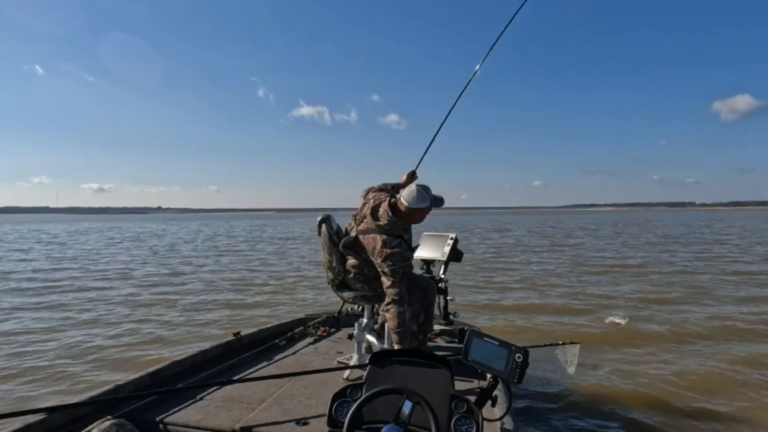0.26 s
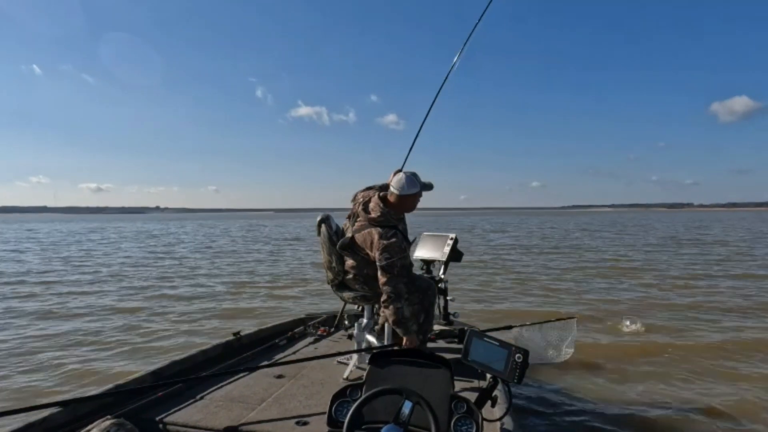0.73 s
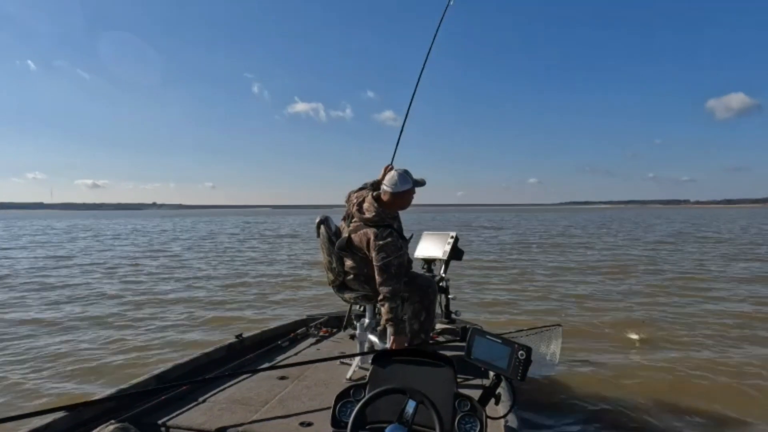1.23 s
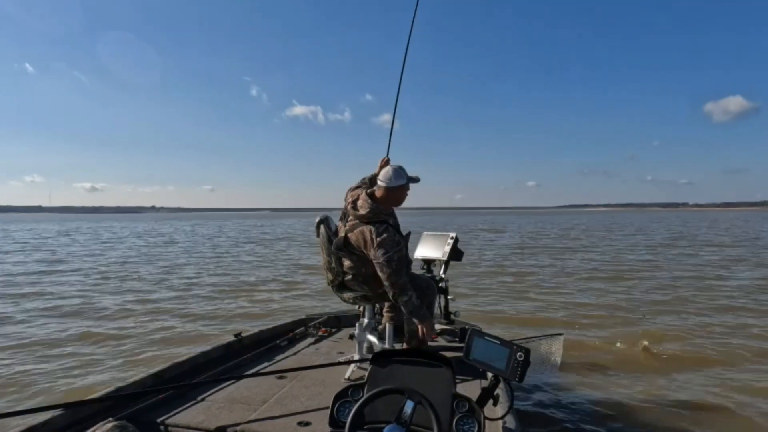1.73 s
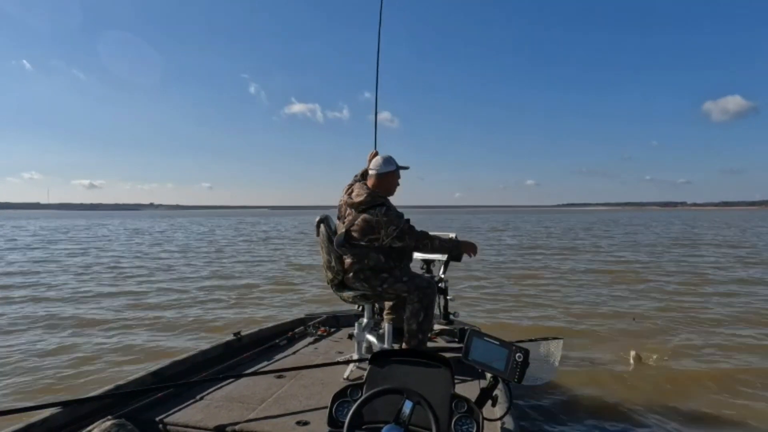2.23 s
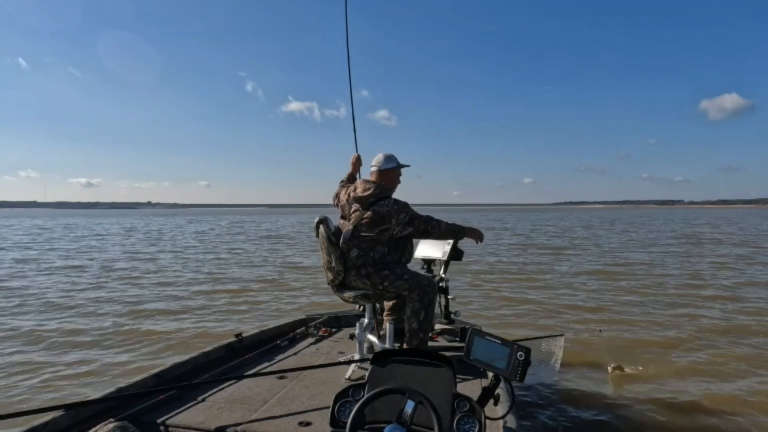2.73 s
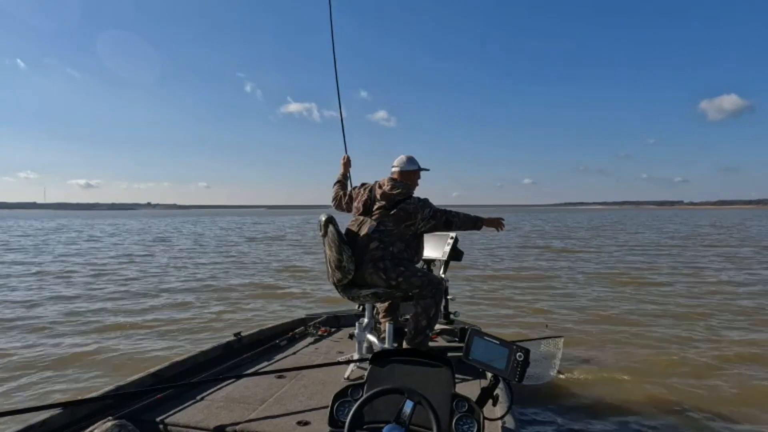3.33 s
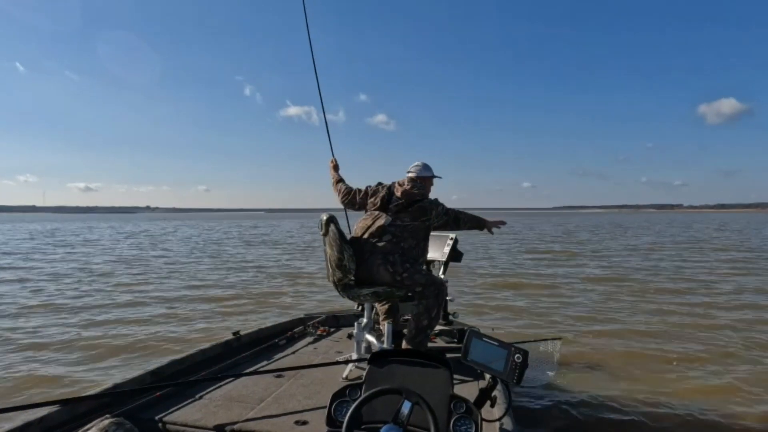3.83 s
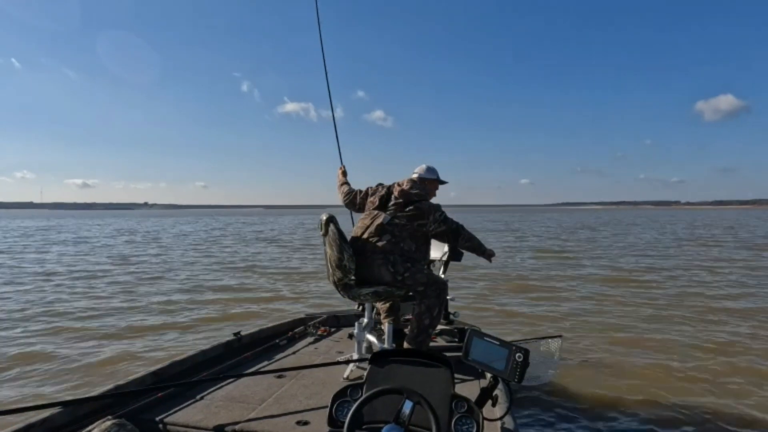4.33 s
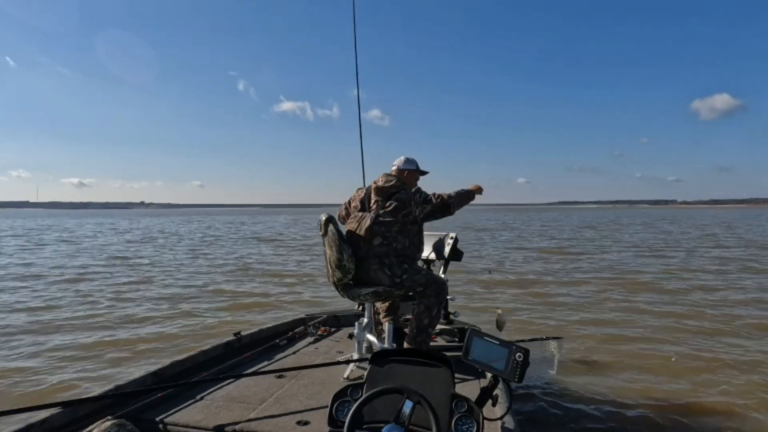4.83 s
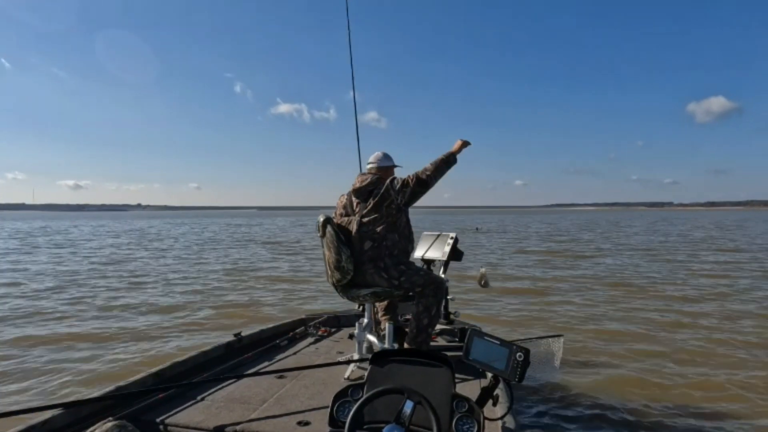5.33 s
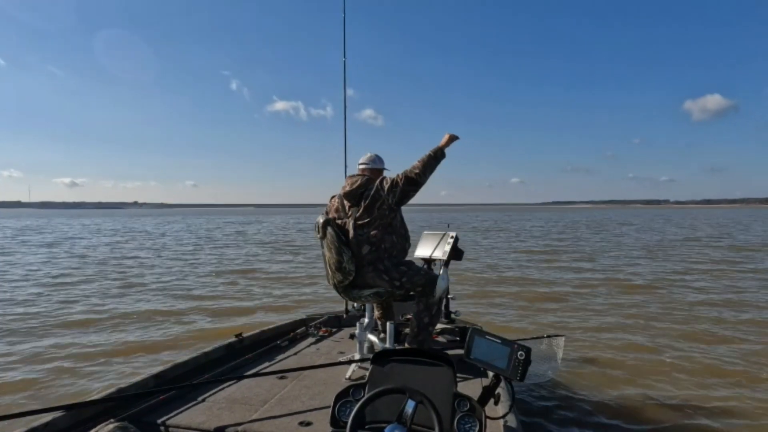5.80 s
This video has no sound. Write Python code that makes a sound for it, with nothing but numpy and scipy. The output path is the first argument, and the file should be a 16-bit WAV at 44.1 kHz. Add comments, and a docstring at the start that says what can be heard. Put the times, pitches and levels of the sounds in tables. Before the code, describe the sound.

A close stereo scene beside a small fishing boat on a choppy lake. Low wind and swell rumble throughout, beneath uneven gurgling, fizz and rising bubbles. A soft hollow lap opens at 0.1 s, followed by small spills and bright plops. Gear clatters on the deck around 0.6-0.8 s, grainy and briefly ringing, as a wave crests; a harder clatter comes at 1.6-1.85 s among deeper plops. Water washes past at 2.2 s, then crisp ticks, a sharp lap at 2.9 s and sliding gulps lead into a dense cluster of plops around 3.4-3.6 s. Laps and a deep trapped-air boom land near 3.87 s. Three hard wet smacks strike the hull at about 4.23, 4.36 and 4.5 s, with short bright ringing over a low hum that sinks and fades by 5.1 s. Faint drips, a double lap and low boom near 5.25 s, and soft spills finish in calmer water until 6 s.

```python
"""On a choppy lake, along the hull of a small fishing boat, heard through a two-port stereo microphone.
Water gurgles and fizzes in noise and rising bubbles; laps, gulps, plops and spills are single events.
An angler sets gear down on the deck in two clattering bursts of grainy, ringing noise, then swings in
a fish: three hard smacks ring the hull over a low hum that sinks away; drips and soft laps follow.
Behind it all lies the filtered noise of wind and swell, with booms of trapped air as low sines."""
import sys
import numpy as np
from scipy import signal
from scipy.fft import rfft, irfft, next_fast_len
from scipy.io import wavfile
from scipy.ndimage import uniform_filter1d, map_coordinates

SR = 44100
rng = np.random.default_rng(int(sys.argv[2]) if len(sys.argv) > 2 else 0)


def store_wav(level_fs):
    """Save 16-bit WAV to argv[1]."""
    pcm = np.round(np.clip(np.atleast_2d(level_fs), -1, 1) * 32767)
    wavfile.write(sys.argv[1], SR, pcm.T.astype(np.int16))


N = 267246  # samples


def amp(db):
    """Amplitude of a level in dB."""
    return 10 ** (np.asarray(db) / 20)


def unit(x):
    """x scaled to rms 1."""
    return x / np.sqrt(np.mean(x ** 2) + 1e-20)


def along(points, hz):
    """Interpolate (frequency, value) points on a log frequency axis."""
    point_hz, values = np.transpose(points)
    return np.interp(np.log(hz + 1), np.log(point_hz + 1), values)


def curves(rows):
    """One value per sample for each column after the time."""
    times, *columns = np.transpose(rows)
    return [np.interp(np.arange(N) / SR, times, column) for column in columns]


def wobble(rate, size=N):
    """A smooth random curve with rate knots a second."""
    knots = rng.standard_normal(int(size * rate / SR) + 4)
    return map_coordinates(knots, [np.arange(size) * rate / SR])


def filtered(x, response):
    """Multiply the spectrum of x by a response of frequency."""
    length = x.shape[-1]
    padded = next_fast_len(length + SR // 10)
    spectrum = rfft(x, padded) * response(np.fft.rfftfreq(padded, 1 / SR))
    return irfft(spectrum, padded)[..., :length]


def add(track, s, sound):
    """Mix a sound into a track at time s."""
    start = max(round(s * SR), 0)
    part = track[..., start:start + sound.shape[-1]]
    part += sound[..., :part.shape[-1]]


# How alike the two sides of broad sounds are: (frequency [Hz], correlation [0 to 1])
LIKENESS = [(25, 0.83), (1000, 0.5), (13000, 0.9)]


def spread(pair, spectrum):
    """Two unrelated signals, mixed as mid and side, become one coloured stereo sound of rms 1."""
    def mid_side(hz):
        turn = np.arccos(np.clip(along(LIKENESS, hz), -1, 1)) / 2
        return amp(along(spectrum, hz)) * [np.cos(turn), np.sin(turn)]

    mid, side = filtered(pair, mid_side)
    return unit(np.array([mid + side, mid - side]))


def bubble(hz, t60, climb):
    """An air pocket rings as a decaying sine and rises by climb octaves over its life."""
    t = np.arange(int(t60 * SR) + 2) / SR
    pitch = hz * 2 ** (climb * t / t60)
    tone = np.sin(2 * np.pi * np.cumsum(pitch) / SR)
    return tone * amp(-60 * t / t60) * (1 - np.exp(-t * hz))


def crowd(low_hz, high_hz, cycles, range_db, count):
    """Many bubbles ring at random times, most of them faint; rms 1."""
    out = np.zeros(N)
    for when, pitch, life, size, climb in rng.random((count, 5)):
        hz = low_hz * (high_hz / low_hz) ** pitch
        sound = bubble(hz, cycles * (.5 + life) / hz, 1.7 * climb ** 1.3)
        add(out, when * N / SR, amp(range_db * size ** 3) * sound)
    return unit(out)


def dying(x, t, decay):
    """Each octave of x fades at its own speed from t = 0."""
    centres = np.geomspace(100, 12800, 8)

    def octaves(hz):
        return np.array([along(list(zip(centres, pick)), hz) for pick in np.eye(len(centres))])

    fades = amp(-60 * np.maximum(t, 0) / along(decay, centres)[:, None])
    return np.sum(filtered(x, octaves) * fades, axis=0)


def voiced(x, thud_db, body_db, edge_db):
    """Weigh the bands of a blow; the short-time rms of the crack (1200-3500 Hz) peaks at 1."""
    edges = [70, 400, 1200, 3500, 15000]  # Hz; thud, body, crack, edge lie between
    out = 0
    for lo, hi, db in zip(edges, edges[1:], [thud_db, body_db, 0, edge_db]):
        band = filtered(x, lambda hz: 1 / (1 + (hz / hi) ** 10) - 1 / (1 + (hz / lo) ** 10))
        out = out + band * amp(db) / np.sqrt(uniform_filter1d(band ** 2, size=256).max())
    return out


PEAK_AT_S = .02  # where a blow reaches its peak


def blow(tone, decay, length, rise, grain_db, hold=0):
    """Grainy noise, like tiny contacts, swells to its peak, lasts for hold seconds and dies away."""
    t = np.arange(SR // 2) / SR - PEAK_AT_S
    contacts = rng.standard_normal(len(t)) * amp(grain_db * wobble(400, size=len(t)))
    swell = np.exp(-(np.minimum(t, 0) / rise) ** 2)
    coloured = filtered(contacts, lambda hz: amp(along(tone, hz)))
    return dying(coloured * swell, (t - hold) / max(length, .1), decay)


def ringing(modes, width_hz, length):
    """Loose panels ring in rough bands, width_hz at 1 kHz and wider above; length scales the decay."""
    t = np.arange(SR // 2) / SR
    hz, db, t60 = np.transpose(modes)[:, :, None]
    width = width_hz * np.sqrt(hz / 1000)
    noise = rng.standard_normal((len(modes), len(t)))
    bands = filtered(noise, lambda f: np.exp(-2 * ((f - hz) / width) ** 2))
    fades = amp(db - 60 * t / (t60 * length)) * (1 - np.exp(-t / 0.0025))
    return sum(unit(band * fade) * np.sqrt(np.mean(fade ** 2) / 2) for band, fade in zip(bands, fades))


def glancing(x, echo_db, t60):
    """Sound reaches each ear directly and by short detours over the rippled water and the deck."""
    t = np.arange(SR // 20) / SR
    shared = rng.standard_normal(len(t))
    paths = (shared + rng.standard_normal((2, len(t)))) * amp(-60 * t / t60)
    paths *= amp(echo_db) / np.linalg.norm(paths, axis=1, keepdims=True)
    return x + signal.fftconvolve(x[None], paths, axes=1)[:, :N]


# Waves running along the hull:
# (crest time [s], gurgle level [dB], fizz level [dB], ebb to 10 dB below the crest [s])
WAVES = [(0.69, -46.5, -56, 0.38), (1.564, -50, -57, 0.3), (2.22, -53, -62, 0.39),
         (2.598, -57.5, -63, 0.26), (3.011, -53, -61.5, 0.15), (3.525, -52.5, -62.5, 0.22),
         (3.784, -59, -55, 0.078), (4.076, -52, -62, 0.12), (4.381, -49.5, -61, 0.22),
         (4.68, -62, -59.5, 0.041)]
BUILD_SHARE = 0.64  # build-up time as a share of the ebb
CALM_GURGLE_DB, CALM_FIZZ_DB = -68.5, -74  # ripples between the waves


def surge():
    """Each wave's power builds, crests and ebbs on top of the calm ripples; gives two dB curves."""
    t = np.arange(N) / SR
    gurgle, fizz = amp(CALM_GURGLE_DB) ** 2, amp(CALM_FIZZ_DB) ** 2
    for s, gurgle_db, fizz_db, ebb in WAVES:
        fade_db = -10 * np.maximum((s - t) / (BUILD_SHARE * ebb), (t - s) / ebb)
        gurgle = gurgle + amp(gurgle_db + fade_db) ** 2
        fizz = fizz + amp(fizz_db + fade_db) ** 2
    return 10 * np.log10(gurgle), 10 * np.log10(fizz)


# Colour of the low rush of water: (frequency [Hz], relative level [dB per Hz])
GURGLE_COLOUR = [(200, -6), (600, -20.5), (1200, -4.5), (2200, -12.5), (4000, -32.5), (9000, -46.5)]
# Colour of the fizz, also of the ticks: (frequency [Hz], relative level [dB per Hz])
FIZZ_COLOUR = [(1200, -12.5), (2800, -5.5), (5500, 1), (7500, -8), (9500, -10), (12000, -21),
               (15500, -50.5)]
RUSH_CALM_DB, RUSH_STIRRED_DB, BUBBLES_DB = -1, -7.5, -.5  # shares of the gurgle
HISS_CALM_DB, HISS_BREAKING_DB, CRACKLE_DB, DROPLETS_DB = -5.5, -9.5, -5.5, -0.5  # shares of the fizz


def wash():
    """Moving water: a soft noise rush with rising bubbles, and a crackling fizz with spurts of droplets."""
    gurgle_db, fizz_db = surge()
    rush = spread(rng.standard_normal((2, N)) * amp(4.3 * wobble(70)), GURGLE_COLOUR)
    bubbles = crowd(722.3, 2739, cycles=42, range_db=15, count=2000)
    bubbles = bubbles * amp(3 * wobble(40))  # they come in clumps
    bubbles = unit(glancing(bubbles, echo_db=-3, t60=.055))
    stirred = np.clip((gurgle_db - CALM_GURGLE_DB) / 10, 0, 1)  # full 10 dB above calm
    rush_db = RUSH_CALM_DB + (RUSH_STIRRED_DB - RUSH_CALM_DB) * stirred
    gurgle = amp(rush_db) * rush + amp(BUBBLES_DB) * stirred * bubbles

    hiss = spread(rng.standard_normal((2, N)), FIZZ_COLOUR)
    crackle = rng.standard_normal((2, N)) * amp(7.5 * np.minimum(wobble(600), 2.6))
    crackle = spread(crackle, FIZZ_COLOUR)
    droplets = crowd(2400, 9000, cycles=24, range_db=23, count=3000)
    droplets = glancing(droplets, echo_db=-4, t60=.02)
    droplets = unit(filtered(droplets, lambda hz: amp(along(FIZZ_COLOUR, hz))))
    breaking = np.clip((fizz_db - CALM_FIZZ_DB) / 10, 0, 1)
    hiss_db = HISS_CALM_DB + (HISS_BREAKING_DB - HISS_CALM_DB) * breaking
    spurts = amp(3.3 * wobble(45))
    # droplets fly only as waves break
    sparkle = amp(CRACKLE_DB) * crackle + amp(DROPLETS_DB) * breaking * droplets
    spray = amp(hiss_db) * hiss + spurts * sparkle
    return amp(gurgle_db) * gurgle + amp(fizz_db) * spray


# Waves meeting the hull:
# (time [s], crack level [dB], then thud, body, edge re crack [dB], length [factor])
LAPS = [(0.1139, -44, 0.5, -1, -21.5, 0.78), (2.6586, -62, 23, -12, 6.5, 0.38),
        (2.8838, -38.5, 0.5, -3.5, -9.5, 0.59), (3.075, -44, -6, -11, -5.5, 0.6),
        (3.1187, -58.5, 18, 12, -7, 0.81), (3.8578, -44.5, 13.5, -22, 3, 0.2),
        (3.8763, -37, -4.5, -4, -10, 1), (5.2278, -46.5, -4, 1, -11.5, 0.3),
        (5.246, -43, 3, -2, -9.5, 0.36), (5.609, -48.5, 0.5, 1, -7.5, 0.69),
        (5.7797, -55.5, 3, -21.5, -3, 1.0)]
# Colour of a lap: (frequency [Hz], relative level [dB])
LAP_COLOUR = [(60, -15), (160, -4), (400, -6.5), (600, 7.5), (1300, -3.5), (2500, -13.5), (6000, -32),
              (10000, -44), (15500, -59.5)]
# Decay of a lap of length 1: (frequency [Hz], t60 [s])
LAP_DECAY = [(200, 0.53), (800, 0.21), (2500, 0.054), (8000, 0.025)]


def laps():
    """Small waves clap hollowly under the hull, their treble dying sooner than their bass."""
    out = np.zeros(N)
    for s, db, thud_db, body_db, edge_db, length in LAPS:
        clap = blow(LAP_COLOUR, LAP_DECAY, length, rise=0.002, grain_db=5.0)
        add(out, s - PEAK_AT_S, amp(db) * voiced(clap, thud_db, body_db, edge_db))
    return out


# Hollows closing along the hull:
# (time [s], length [s], level [dB], start pitch [Hz], end pitch [Hz])
GULPS = [(2.926, 0.083, -51, 500, 790), (3.627, 0.034, -49.5, 710, 776), (3.933, 0.057, -51.5, 556, 1610)]


def gulps():
    """A hollow closes between water and hull: its unsteady note holds, then slides up ever faster."""
    out = np.zeros(N)
    for s, length, db, start_hz, end_hz in GULPS:
        progress = np.linspace(0, 1, int(length * SR))
        hz = start_hz * (end_hz / start_hz) ** (progress ** 2)
        flutter = amp(3 * wobble(160, size=len(progress)))
        arch = 2 * np.sqrt(progress * (1 - progress))
        note = np.sin(2 * np.pi * np.cumsum(hz) / SR)
        add(out, s, amp(db) * note * arch * flutter)
    return out


# Soft spills and bursts of spray:
# (crest time [s], crest level [dB], centre [Hz], time constant of swell and fade [s])
SPLASHES = [(0.296, -51, 2690, 0.009), (0.475, -54.5, 6540, 0.02), (0.926, -52, 3900, 0.03),
            (1.08, -58, 2760, 0.038), (3.1, -43.5, 990, 0.022), (4.08, -49, 880, .022),
            (4.991, -55, 2447, 0.0076), (5.174, -60, 2390, 0.01), (5.447, -52, 1060, 0.02),
            (5.762, -56, 2030, 0.016)]


def splashes():
    """Small spills of water swell and fade as a grainy band of noise."""
    out = np.zeros(N)
    t = np.arange(SR // 2) / SR - 1 / 4
    half_width = 0.4  # octaves
    for s, db, hz, length in SPLASHES:
        spray = rng.standard_normal(len(t)) * amp(5.5 * wobble(300, size=len(t)))
        spray = filtered(spray, lambda f: 1 / (1 + np.abs(np.log2((f + 1) / hz) / half_width) ** 3))
        add(out, s + t[0], amp(db) * unit(spray) * np.exp(-np.abs(t) / length))
    return out


# Single plops and drips: (time [s], peak level [dB], starting pitch [Hz], t60 [s])
PLOPS = [(0.308, -36, 1260, 0.017), (0.442, -29.5, 2090, 0.012), (0.499, -36.5, 1680, 0.069),
         (0.55, -26.5, 1060, 0.036), (0.747, -22, 990, 0.029), (0.833, -29, 790, 0.014),
         (0.842, -36, 2350, 0.02), (0.898, -36, 1450, 0.08), (1.081, -37.5, 990, 0.031),
         (1.485, -25, 967, 0.025), (1.519, -24.5, 1500, 0.019), (1.526, -21.5, 639, 0.03),
         (1.933, -44, 1102, 0.046), (2.12, -45, 1560, 0.071), (2.212, -39, 724, 0.068),
         (2.33, -28.5, 1790, 0.012), (2.599, -41.5, 1095, 0.051), (2.634, -39, 1504, 0.019),
         (3.001, -34.5, 1980, 0.018), (3.035, -42, 956, 0.034), (3.343, -39, 2820, 0.0084),
         (3.381, -31, 1010, 0.075), (3.436, -36.5, 732, 0.045), (3.46, -32.5, 1050, 0.01),
         (3.487, -42.5, 573, 0.093), (3.529, -35, 1410, 0.037), (3.546, -37.5, 990, 0.048),
         (3.565, -37, 760, 0.044), (3.586, -38, 1420, 0.044), (3.705, -33.5, 3030, .02),
         (3.757, -40, 2030, 0.026), (4.695, -43.5, 2650, 0.026), (4.824, -44.5, 2170, 0.021)]
# Single droplets and small clicks: (time [s], peak level [dB])
TICKS = [(2.4, -38), (2.6, -31), (3.196, -45), (3.43, -30.5), (3.7556, -31), (3.8, -33.5), (3.8434, -35),
         (4.819, -41.5), (5.061, -54)]
CLIMB_OCTAVES_PER_S, DEEP_HZ = 34, 1050  # pockets below DEEP_HZ lie deeper and climb more slowly
PUFF_DB = -9  # wet puff of noise beside each plop


def drops():
    """Single air pockets plop with a wet puff and climb in pitch; droplets and small parts tick."""
    out = np.zeros(N)
    for s, db, hz, t60 in PLOPS:
        climb = CLIMB_OCTAVES_PER_S * min(hz / DEEP_HZ, 1) ** 2 * t60
        add(out, s, amp(db) * bubble(hz, t60, climb))
        puff_colour = [(hz / 4, -40), (hz, 0), (hz * 3, -18), (hz * 9, -65)]
        puff = blow(puff_colour, [(hz, .07)], 0.78, rise=0.0007, grain_db=1.5)
        add(out, s - PEAK_AT_S, amp(db + PUFF_DB) * puff / np.abs(puff).max())
    for s, db in TICKS:
        tick = blow(FIZZ_COLOUR, [(3000, 0.029), (10000, 0.012)], 0.52, rise=0.000095, grain_db=7.5)
        add(out, s - PEAK_AT_S, amp(db) * tick / np.abs(tick).max())
    return glancing(out, echo_db=-14.0, t60=0.1)


# Hard smacks on the hull: (time [s], crack level [dB], then thud, body, edge re crack [dB],
# rise [s], rattle [s], resonance [Hz])
SMACKS = [(4.2276, -23.5, -10, -3.5, -9, 0.0018, 0.0026, 2410),
          (4.359, -19.5, -22.5, -7, -1, 0.0077, 0.00033, 1390),
          (4.499, -20.5, -14, -8, -10.5, 0.0036, 0.0078, 3040)]
# Colour of a smack: (frequency [Hz], relative level [dB])
SMACK_COLOUR = [(80, -34.5), (300, -12), (700, -8.5), (1400, 5), (2200, 1), (2900, 4), (3900, -4),
                (5400, -13.5), (7000, -19), (9300, -31), (15500, -65.5)]
# Decay of a smack: (frequency [Hz], t60 [s])
SMACK_DECAY = [(300, 0.2), (1400, 0.064), (4500, 0.016), (10000, 0.034)]
# Ringing of the hull: (frequency [Hz], relative level [dB], t60 [s])
HULL_MODES = [(408, -8, 0.41), (900, 1.5, .14), (1220, 1.5, 0.2), (1550, 1, 0.2), (2975, -8.5, 0.3)]
HULL_RING_DB = -17


def smacks():
    """Hard wet smacks, each with its own bright resonance, set the hull ringing."""
    out, ring = np.zeros(N), np.zeros(N)
    for s, db, thud_db, body_db, edge_db, rise, hold, hz in SMACKS:
        slap = blow(SMACK_COLOUR, SMACK_DECAY, 0.99, rise, grain_db=2.5, hold=hold)
        slap = filtered(slap, lambda f: 1 + 2.0 / (1 + ((f - hz) / 150) ** 2))
        add(out, s - PEAK_AT_S, amp(db) * voiced(slap, thud_db, body_db, edge_db))
        add(ring, s, amp(db) * ringing(HULL_MODES, width_hz=170, length=1))
    return out + amp(HULL_RING_DB) * ring


# Gear set down on the deck:
# (time [s], crack level [dB], then thud, body, edge re crack [dB], length [factor])
KNOCKS = [(0.576, -28, -17, 1.5, -7.5, 0.7), (0.6553, -33.5, -10, -2.5, -9.5, 0.39),
          (0.7086, -40, -23, 0, -9.5, 0.7), (0.763, -40, -11, 3, -7.5, 0.83),
          (1.6063, -20.5, -5.5, -10, -6.5, 0.91), (1.625, -31, 0, 3.5, -5, 0.55),
          (1.679, -24, -9.5, -6.5, -8.5, 0.83), (1.697, -36.5, 2, -3, -7, 0.88),
          (1.7416, -34.5, -7.5, 1, -12.5, 0.7), (1.8362, -29, -7, -5, -4.5, 0.39)]
# Colour of a knock: (frequency [Hz], relative level [dB])
KNOCK_COLOUR = [(50, -11.5), (110, -0.5), (250, 5.5), (430, -8.5), (600, -3.5), (930, -1), (1400, -5),
                (3000, -13.5), (6000, -13.5), (9500, -25.5), (15500, -51.5)]
# Decay of a knock of length 1: (frequency [Hz], t60 [s])
KNOCK_DECAY = [(150, 0.59), (900, 0.18), (2500, 0.085), (9000, 0.028)]
# Ringing of the gear at length 1: (frequency [Hz], relative level [dB], t60 [s])
GEAR_MODES = [(180, -3, 0.14), (288, 0, 0.21), (394, 1, 0.16), (775, -2.5, 0.18), (907, 3.5, 0.15),
              (1830, -2, 0.14), (2920, -5.5, 0.12), (4324, -20.5, 0.29)]
KNOCK_HOLD_S, GEAR_RING_DB = 0.0067, -1  # rattle of a knock of length 1; level of the ringing


def knocks():
    """Gear clatters on the deck in short grainy blows and rings in rough bands."""
    out, ring = np.zeros(N), np.zeros(N)
    for s, db, thud_db, body_db, edge_db, length in KNOCKS:
        clatter = blow(KNOCK_COLOUR, KNOCK_DECAY, length, rise=0.0007 * length, grain_db=3.5,
                       hold=KNOCK_HOLD_S * length)
        add(out, s - PEAK_AT_S, amp(db) * voiced(clatter, thud_db, body_db, edge_db))
        # a short, damped knock rings less
        add(ring, s, amp(db) * length * ringing(GEAR_MODES, width_hz=60, length=length))
    return out + amp(GEAR_RING_DB) * ring


# Decay of the tail from deck and hull: (frequency [Hz], t60 [s])
BOAT_DECAY = [(200, 0.3), (1300, 0.13), (5000, 0.15), (12000, 0.0073)]


def boat(x):
    """Deck and hull scatter a short tail, different at each ear."""
    t = np.arange(SR // 2) / SR
    tails = np.array([dying(rng.standard_normal(len(t)), t, BOAT_DECAY) for ear in range(2)])
    return signal.fftconvolve(x[None], tails / np.linalg.norm(tails[0]), axes=1)[:, :N]


# Low hum beneath and after the smacks, before its wavering: (time [s], pitch [Hz], level [dB])
HUM = [(4.1, 132, -77), (4.25, 130.6, -50), (4.48, 119.3, -47.5), (4.62, 98.3, -40.5), (5.0, 100.4, -48),
       (5.12, 99, -88)]


def hum():
    """A low sine swells, sinks and fades, wavering in pitch and level."""
    hz, level_db = curves(HUM)
    phase = 2 * np.pi * np.cumsum(hz * (1 + .05 * wobble(35))) / SR
    return np.sin(phase) * amp(level_db + 2.5 * wobble(20))


# Air trapped under the hull: (time [s], peak level [dB], starting pitch [Hz], t60 [s])
BOOMS = [(1.851, -20, 59, 0.19), (2.767, -33, 100, 0.25), (3.864, -10, 28.5, 0.14),
         (3.908, -22.5, 390, 0.036), (5.28, -18, 33, 0.17)]


def booms():
    """Trapped air booms and gulps as low decaying sines that rise in pitch."""
    out = np.zeros(N)
    for s, db, hz, t60 in BOOMS:
        add(out, s, amp(db) * bubble(hz, t60, climb=0.406))
    return out


# Wind and swell: (time [s], level [dB])
SWELL = [(0.0, -41), (3.44, -46.5), (3.81, -42), (6.06, -47)]
# Colour of wind and swell: (frequency [Hz], relative level [dB per Hz])
RUMBLE_COLOUR = [(12, -26.5), (20, 5), (64, -2.5), (290, -20), (700, -36), (910, -56.5), (1540, -120)]


def rumble():
    """Wind and swell drone as low noise spread over both sides."""
    level_db, = curves(SWELL)
    return amp(level_db) * spread(rng.standard_normal((2, N)), RUMBLE_COLOUR)


def scene():
    """Water, gear and fish share the tail of the boat; wash and the low background are added without it."""
    gear = glancing(knocks(), echo_db=-11, t60=0.06)
    hits = glancing(smacks(), echo_db=-12.5, t60=0.01)
    water = glancing(laps() + splashes() + gulps(), echo_db=-11.0, t60=0.039) + drops()
    sends = amp(-11.5) * gear + amp(-17.0) * hits + amp(-12.0) * water
    tail = boat(np.mean(sends, axis=0))
    background = rumble() + hum() + booms()
    return gear + hits + water + tail + wash() + background


# Colour difference of the microphone ports: (frequency [Hz], left minus right [dB])
PORT_LEAN = [(30, 3.5), (150, -0.9), (600, -0.5), (4500, -0.1)]
# Phase difference of the ports: (frequency [Hz], lead of the left [rad])
PORT_LEAD = [(100, -0.1), (780, -0.5), (3100, -0.6), (10000, -0.17)]
TOP_HZ = 15700  # band limit


def record(dry):
    """The two microphone ports differ a little in colour and phase; nothing passes the band limit."""
    side = np.array([[1], [-1]]) / 2

    def ports(hz):
        colour = amp(side * along(PORT_LEAN, hz))
        phase = np.exp(1j * side * along(PORT_LEAD, hz))
        return colour * phase * (hz < TOP_HZ)

    return filtered(dry, ports)


dry = scene()
out = record(dry)
store_wav(out)
```